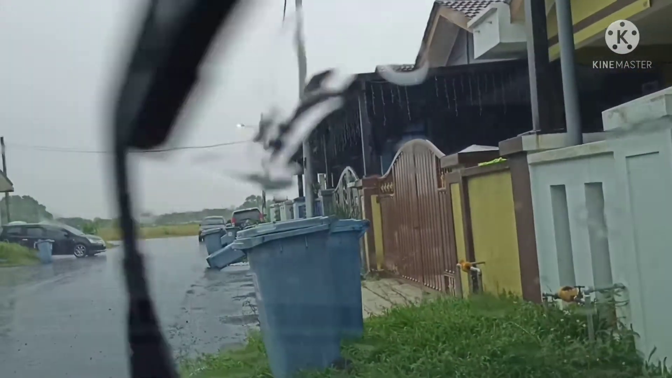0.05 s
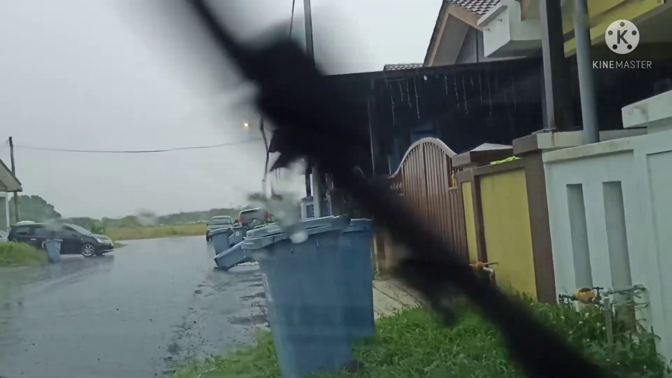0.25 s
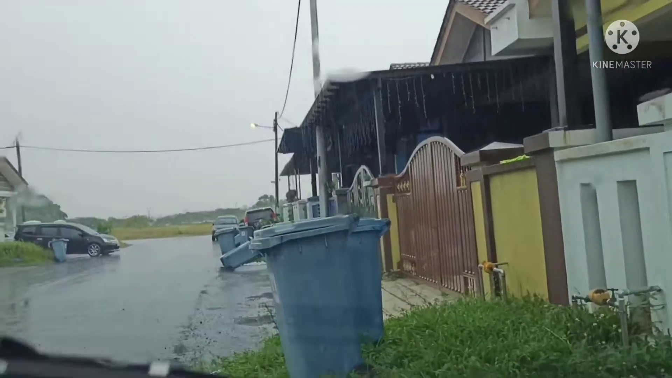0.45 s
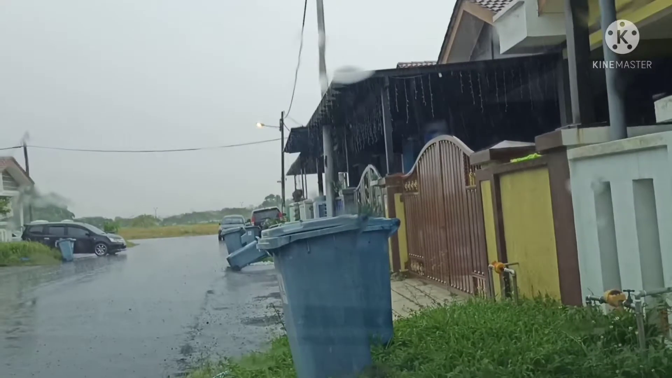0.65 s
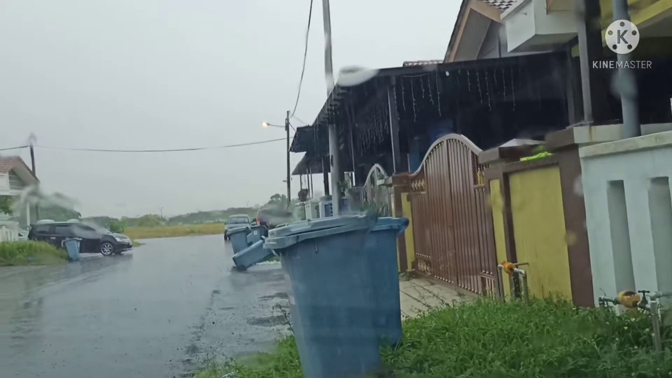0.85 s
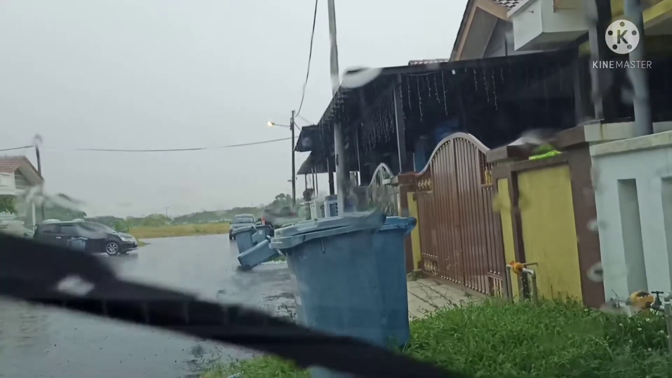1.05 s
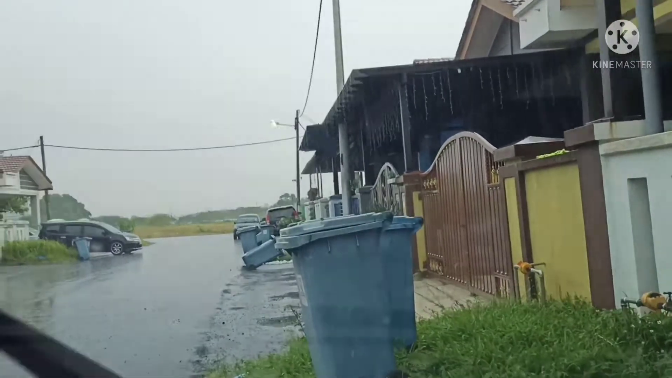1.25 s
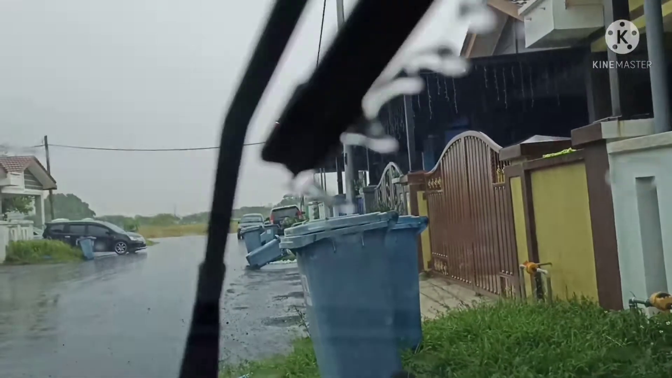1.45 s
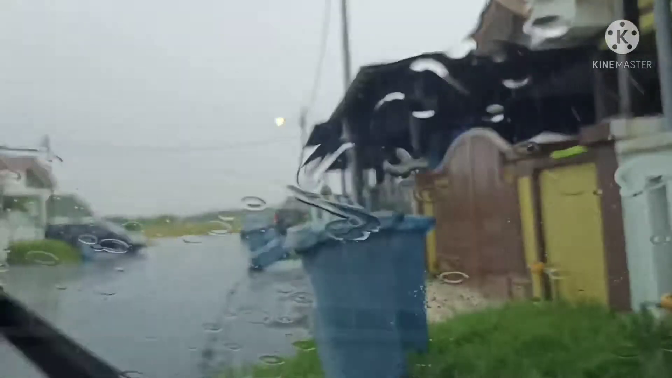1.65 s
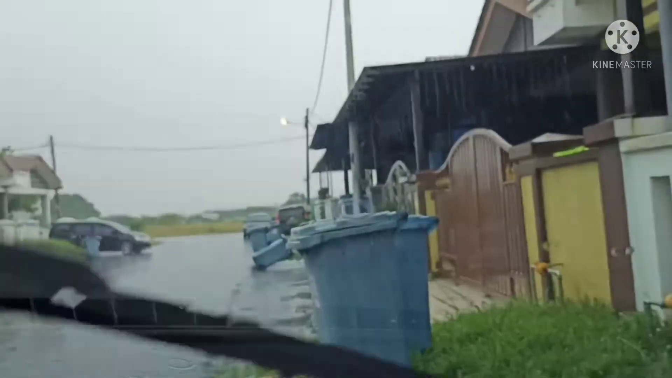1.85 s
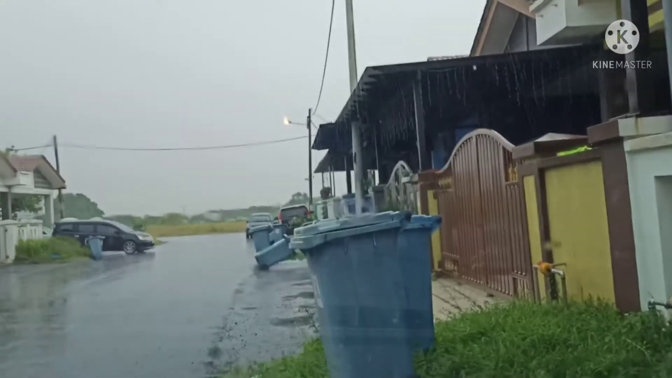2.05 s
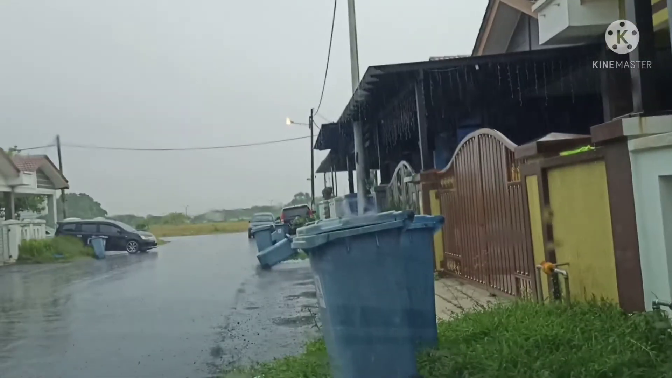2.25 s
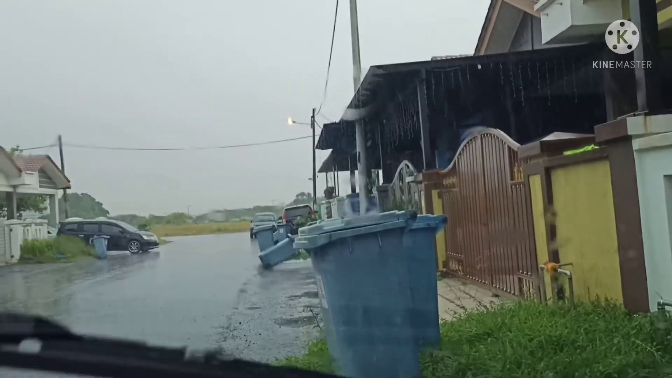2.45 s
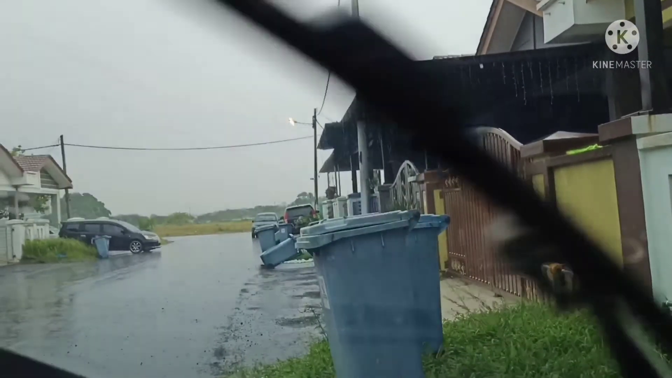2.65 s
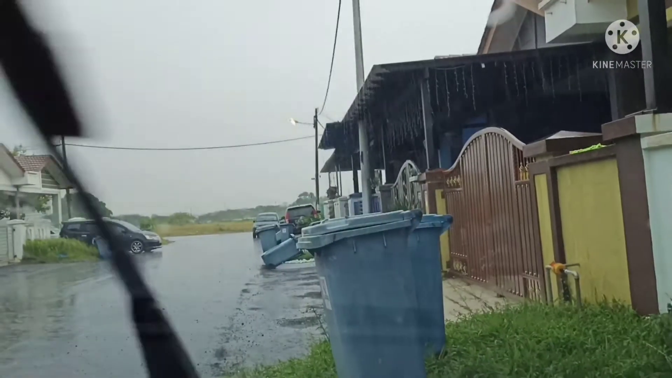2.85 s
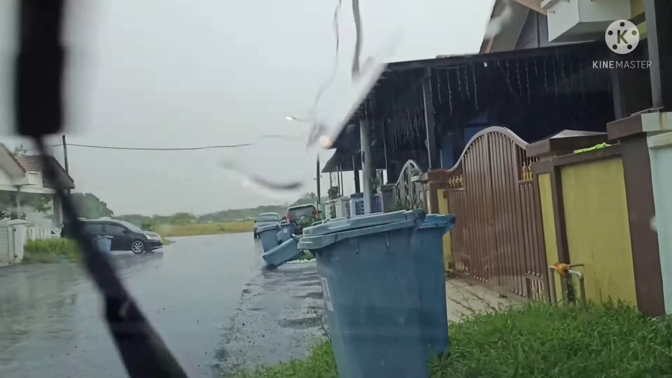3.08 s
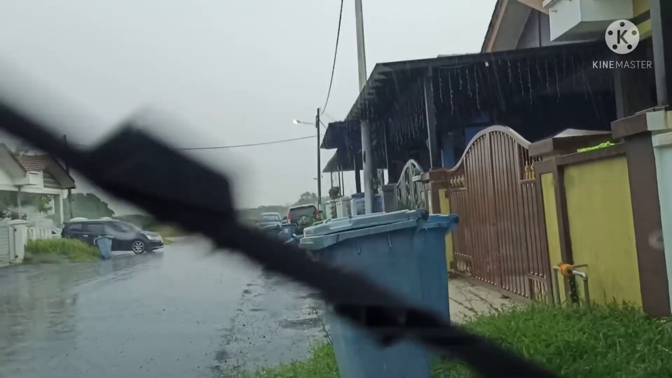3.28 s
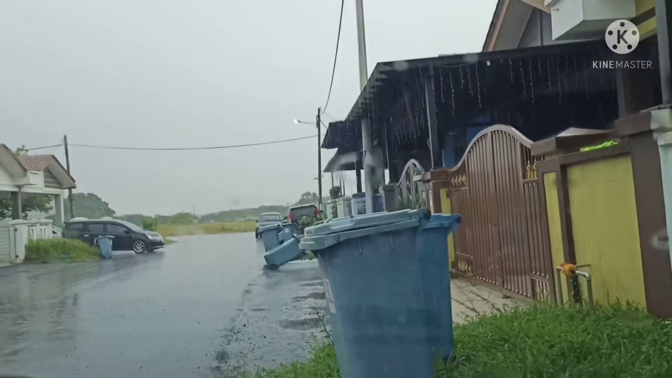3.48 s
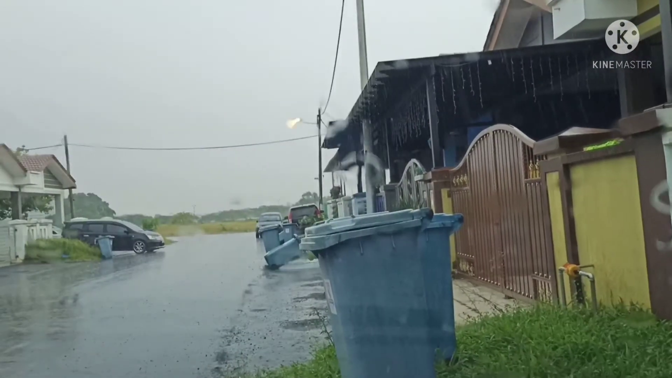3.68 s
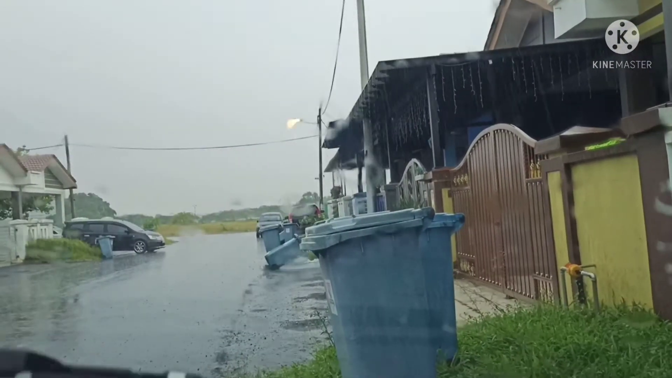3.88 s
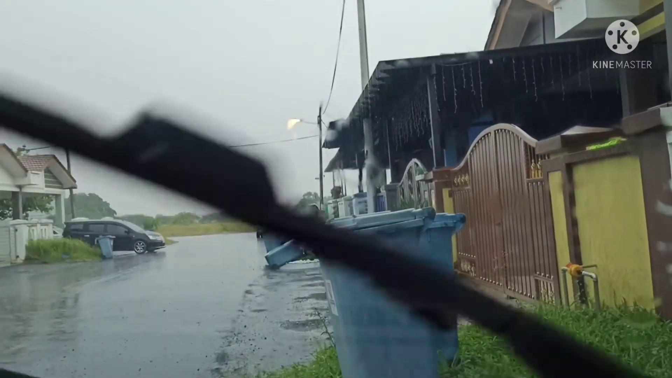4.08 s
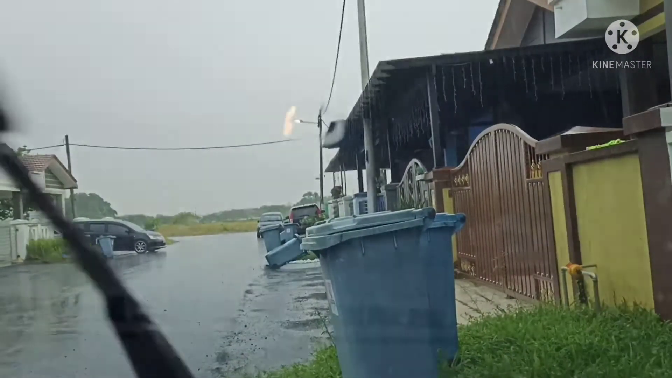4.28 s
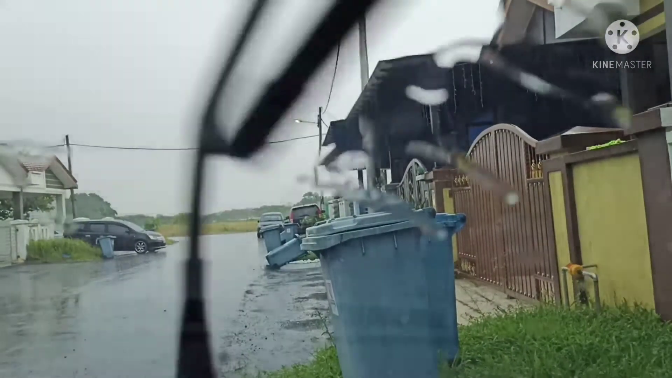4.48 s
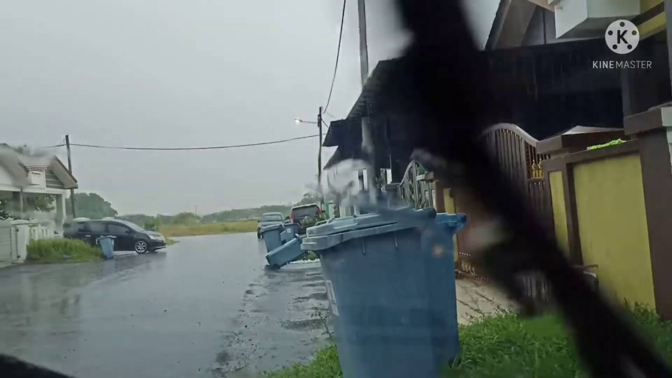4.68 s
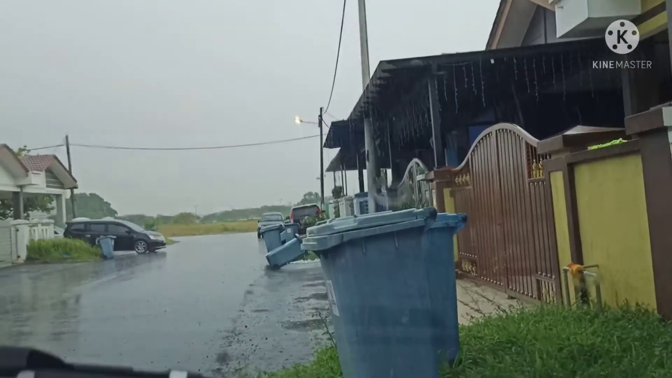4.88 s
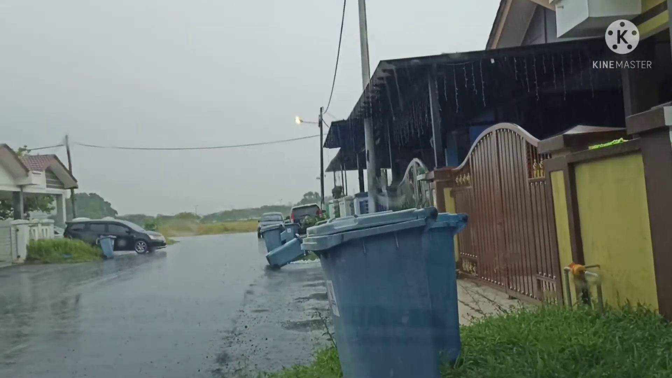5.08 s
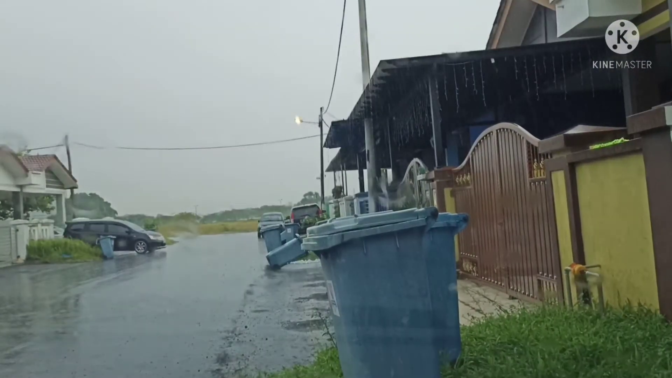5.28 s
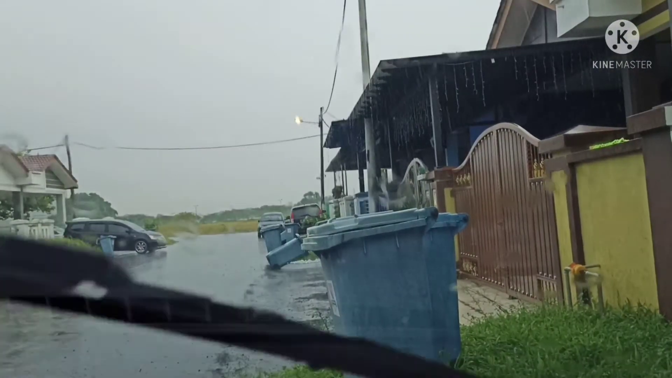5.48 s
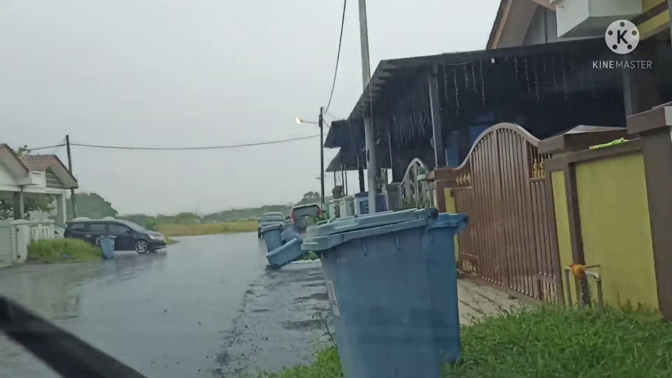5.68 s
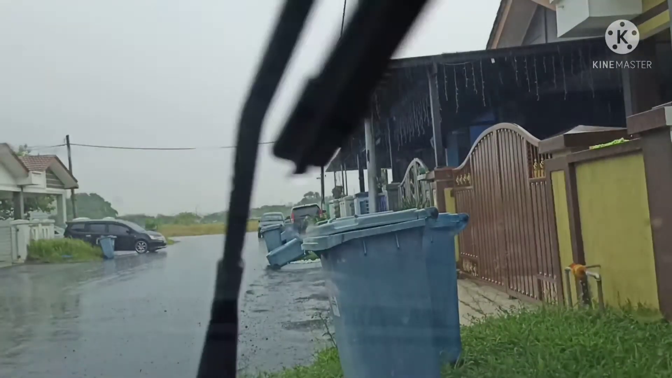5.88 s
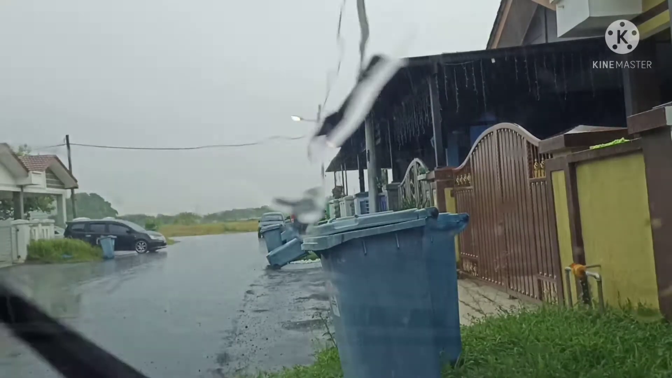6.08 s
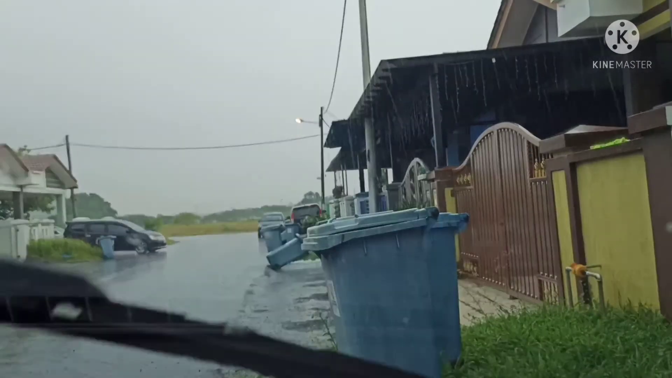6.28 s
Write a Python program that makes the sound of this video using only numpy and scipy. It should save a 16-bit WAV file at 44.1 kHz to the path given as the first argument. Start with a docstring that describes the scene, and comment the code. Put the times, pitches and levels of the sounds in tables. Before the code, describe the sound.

From the front seat of a closed, parked car, windshield wipers beat a steady rhythm, alternating a heavy, dull thump with a softer hollow knock and click. Between turns the rubber drags across the glass with a low rumble, a watery hiss and occasional brief judders. Dense rain patters on the glass and drums on the roof the whole time, with a few bigger drops splashing close by.

```python
"""Heavy rain on a parked car, heard from the front seat: drops tick on the glass and drum on the roof.
The wipers run. At one end of each sweep the blades flip with a thump that rings windscreen and cabin air;
at the other they knock lightly. Play in the linkage adds clicks and hollow knocks. Between turns the
rubber rumbles, judders in stick-slip bursts, hisses through the water film and squelches twice."""
import sys
import numpy as np
from scipy import signal
from scipy.fft import rfft, irfft
from scipy.io import wavfile
from scipy.ndimage import uniform_filter1d

SR = 44100
rng = np.random.default_rng(int(sys.argv[2]) if len(sys.argv) > 2 else 0)


def unload_wav(signal):
    """Save mono or channel-first audio to the path in sys.argv[1] as 16-bit WAV at rate SR, clipped to [-1, 1]."""
    wavfile.write(
        sys.argv[1],
        SR,
        np.round(np.clip(np.atleast_2d(signal).T, -1, 1) * 32767).astype(np.int16),
    )


N = 279153
TIME = np.arange(N) / SR

# drops on glass: (frequency [Hz], level [dB])
GLASS_TONE = [(400, -4), (850, 2.5), (1100, 3), (1900, 0), (2400, -3), (3900, -.7), (4800, -2.5),
              (5600, -6), (6500, -8), (8100, -5.5), (10500, -18.5), (12700, -23), (15000, -20),
              (16000, -22)]
# close splashes: (frequency [Hz], level [dB])
SPLASH_TONE = [(800, -12), (2000, -4), (4000, 0), (6000, -1), (8000, 0), (11000, -9), (15000, -14)]
# drops through the roof lining: (frequency [Hz], level [dB])
ROOF_TONE = [(25, -21), (40, -11), (52, 1.5), (68, -6), (110, 2), (200, 0), (310, -2.5), (470, -10),
             (660, -5.5), (850, -16), (1400, -23), (2500, -52.5)]
# big drops on the windscreen: (time [s], level [dB], treble [dB])
BIG_DROPS = [(0.0727, -27, -3), (0.4249, -23.5, -5), (0.5668, -25.5, -2), (3.3278, -29, -18),
             (3.4155, -22, 3), (3.442, -34, -8), (3.8415, -31, -2), (4.201, -28, -10), (4.2479, -25.5, 7),
             (4.9891, -27.5, -5), (5.5956, -29, -11), (6.0497, -24.5, -2), (6.182, -31.5, 1)]
# rubber dragging on glass: (frequency [Hz], level [dB])
DRAG_TONE = [(30, -52.5), (62, -8), (80, -4), (108, 4.5), (140, 2.0), (180, -1.5), (250, -7.0),
             (400, -18), (520, -21), (750, -28), (1500, -39.5), (4000, -60)]
# extra grip as the blades slow to reverse: (middle [s], level [dB])
GRIPS = [(.22, -26), (0.961, -29.5), (1.69, -25), (2.45, -26.5), (3.19, -29.5), (3.92, -33.5), (4.64, -24),
         (5.411, -25), (6.149, -28.5)]
# patches of water film: (start [s], length [s], attack [s], release [s], level [dB])
FILM_PATCHES = [(-.1, 0.5, .1, 0.23, -45.5), (.33, 0.56, 0.17, 0.089, -44.5), (.96, 0.19, 0.07, .06, -45),
                (1.072, 0.37, 0.038, 0.089, -31), (1.733, 0.89, 0.074, 0.27, -48.5),
                (2.7, 0.37, .06, 0.13, -37.5), (3.037, 0.14, 0.035, 0.087, -37.5)]
# spray off the blade: (frequency [Hz], level [dB])
SPRAY_TONE = [(2000, -26), (4000, -15.5), (5000, -17), (6000, -18), (7200, -6), (8100, 2), (8800, -4),
              (10300, -8.5), (11400, -3), (12500, -8.5), (15000, -0.5), (16000, 2.5)]
# lower hiss of thick film: (frequency [Hz], level [dB])
THICK_FILM_TONE = [(2000, -30), (4000, -11), (4700, 0), (5800, -9), (7000, -0.5), (8200, 0), (10000, -12),
                   (16000, -23)]
# stick-slip bursts: (middle [s], length [s], slip rate [Hz], level [dB])
JUDDER_BURSTS = [(1.1, .08, 186, -18), (1.162, .09, 163, -17.5), (1.225, .13, 166, -22),
                 (2.901, .13, 135, -29), (4.03, .11, 184, -13), (4.09, .09, 218, -26.5),
                 (4.155, .11, 173, -22), (4.305, .12, 191, -23.5)]
# juddering blade: (frequency [Hz], level [dB])
SLIP_TONE = [(30, -40), (60, -21), (85, -14), (175, 5), (350, -15.5), (440, -27), (530, -16.5), (750, -47),
             (1500, -54)]
# wet rubber squelches: (start [s], length [s], first pitch [Hz], last pitch [Hz], level [dB])
SQUELCH_GLIDES = [(1.891, 0.086, 1497, 1020, -31.5), (2.161, .054, 1064, 1910, -31)]
# squelch resonances: (pitch ratio [1], level [dB])
SQUELCH_MODES = [(.48, -3), (1, 1), (1.48, -6.5), (2.35, -4.5), (3.15, -6), (4.6, -13)]
# squelch hiss: (frequency [Hz], level [dB])
SQUELCH_TONE = [(1000, 0.5), (2200, -8), (2900, -6), (4600, 2), (6000, -4), (7200, 4.5), (8200, 2),
                (10000, -11), (16000, -12)]
# play in the linkage: (time [s], knock [dB], pitch [Hz], click [dB])
LINKAGE_KNOCKS = [(.985, -15.5, 304, -24), (1.425, -26, 295, -30), (2.477, -17.5, 301, -37),
                  (3.883, -22.5, 285, -31.5), (3.948, -16, 303, -26), (4.131, -20.5, 298, -37),
                  (4.389, -26.5, 295, -29.5), (5.419, -20, 309, -30.5)]
# linkage click: (frequency [Hz], level [dB])
CLICK_TONE = [(400, -4), (800, 6), (1150, 9), (1700, -6), (3200, 2.5), (4600, -1), (6000, -25), (8500, -10),
              (12000, -31), (16000, -24)]
# blade flips: (time [s], blow [dB], extra cabin boom [dB], extra windscreen ring [dB],
# slap [dB], blow to slap [s], slap to second blade's clack [s])
FLIPS = [(.187, 0.5, 2, -6.5, -20.5, 0.0071, 0.0046), (1.676, -7.5, -2.5, 7.5, -16.5, 0.0033, 0.0043),
         (2.451, -17, 3.5, -4.5, -31, 0.0011, 0.022), (3.159, 0.5, 2, -5, -18.5, .008, 0.0041),
         (4.635, -4.5, -4.5, 1.5, -19.5, 0.0029, 0.00405), (5.397, -16.5, 3, -0.5, -33, 0.0037, 0.021),
         (6.097, -1, -1.5, 1, -23, 0.0063, 0.0029)]
# modes of cabin air (rows 0-3), windscreen (4), wiper arms (rest): (frequency [Hz], level [dB], T60 [s])
THUMP_MODES = [(80.4, -13, 0.34), (100.7, 1, 0.18), (111.6, -11, 0.35), (129, -4.5, 0.16), (169, 5, 0.19),
               (185.5, -1, 0.18), (240, -3, 0.15), (281.2, -6.5, 0.14), (376.7, -13, 0.14),
               (397, -13, 0.065), (530.4, -21.5, 0.14), (628, -10, 0.036)]
# wet rubber slapping glass: (frequency [Hz], level [dB])
SLAP_TONE = [(200, -24), (400, 7.5), (800, -3), (1200, 8), (1700, -11.5), (3500, -20.5), (5000, -9.5),
             (8000, -13), (11000, -26.5), (16000, -21)]
# blade holder clack: (frequency [Hz], level [dB])
CLACK_TONE = [(200, -29), (400, 7.5), (500, -1), (650, 7), (830, 7.5), (1000, -13.5), (1180, -7),
              (1350, -13), (1700, -19), (3500, -21), (8000, -47), (16000, -44)]
# window reflections: (delay [s], gain [1])
WINDOW_ECHOES = [(.0013, 0.2), (.0029, -0.15), (.0047, 0.12), (.0071, -0.14)]


def gain_of(db):
    """Decibels to amplitude."""
    return 10 ** (np.asarray(db) / 20)


def unit_rms(x):
    """Scales to rms 1."""
    return x / np.sqrt(np.mean(x ** 2) + 1e-20)


def add(mix, start_s, sound):
    """Mixes a sound in at start_s."""
    part = mix[max(round(start_s * SR), 0):][:len(sound)]
    part += sound[:len(part)]


def colour(x, tone, size=4096):
    """Minimum-phase, unit-energy filter shaped by (frequency [Hz], level [dB]) rows."""
    hz, db = np.transpose(tone)
    bin_hz = abs(np.fft.fftfreq(size, 1 / SR))
    log_gain = np.log(gain_of(np.interp(np.log(bin_hz + 1), np.log(hz), db)))
    impulse = np.fft.ifft(np.exp(np.conj(signal.hilbert(log_gain)))).real[:size // 2]
    return signal.oaconvolve(x, impulse / np.linalg.norm(impulse))[:len(x)]


def wander(n, rate_hz):
    """Smooth random curve, rms about 1."""
    hz = np.fft.rfftfreq(N, 1 / SR)
    spectrum = rfft(rng.standard_normal(N)) / (1 + (hz / rate_hz) ** 4)
    return unit_rms(irfft(spectrum, N))[:n]


def resonate(x, hz, width_hz=100):
    """Unity-gain resonance tracking the curve hz."""
    carrier = np.exp(2j * np.pi * np.cumsum(hz) / SR)
    pole = np.exp(-np.pi * width_hz / SR)
    return 2 * (carrier * signal.lfilter([1 - pole], [1, -pole], x / carrier)).real


def patter(per_s, spread_db, max_spreads):
    """Random impacts, mostly small, a few large."""
    size = gain_of(spread_db * np.minimum(rng.exponential(1, N), max_spreads))
    return size * rng.choice([-1, 1], N) * (rng.random(N) < per_s / SR)


def spatter(impacts, tone, wet, decay_s):
    """Impacts on a surface, each trailed by droplets and reflections; rms 1."""
    pole = np.exp(-2 / (decay_s * SR))
    power = signal.lfilter([1 - pole], [1, -pole], impacts ** 2)
    tails = wet * np.sqrt(power) * rng.standard_normal(N)
    return unit_rms(colour(impacts + tails, tone))


def rain(base_db=-47, ease_db_per_s=0.4238, gust_db=0.44):
    """Easing shower: ticks on glass, close splashes, a wash of far drops, dull roof drumming."""
    level = gain_of(base_db - ease_db_per_s * TIME + gust_db * wander(N, rate_hz=0.85))
    ticks = spatter(patter(per_s=520, spread_db=5, max_spreads=3.75), GLASS_TONE, wet=.87, decay_s=.0054)
    splashes = spatter(patter(per_s=45, spread_db=4, max_spreads=2.2), SPLASH_TONE, wet=1, decay_s=.002)
    wash = unit_rms(colour(rng.standard_normal(N), GLASS_TONE)) * gain_of(0.58 * wander(N, rate_hz=6.8))
    roof = spatter(patter(per_s=380, spread_db=0.5, max_spreads=5), ROOF_TONE, wet=.87, decay_s=.0081)
    return level * (gain_of(2) * (ticks + .4 * splashes) + gain_of(1.5) * wash + gain_of(12) * roof)


def big_drops():
    """Each drop splashes briefly and gives the pane a dull pat."""
    out, t = np.zeros(N), TIME[:SR // 12]
    for time_s, db, treble_db in BIG_DROPS:
        splash = rng.standard_normal(len(t)) * (np.exp(-t / 0.0013) + 0.065 * np.exp(-t / 0.036))
        tone = [(300, -2.0), (1100, -6.0), (2300, -5.5), (3800, 1.5),
                (6000, -16 + treble_db / 2), (8000, treble_db), (12000, treble_db - 20)]
        pat = 0.38 * np.sin(2 * np.pi * rng.uniform(490, 820) * t) * np.exp(-t / 0.0075)
        add(out, time_s, gain_of(db - 3) * (colour(splash, tone) + pat))
    return out


def drag(sweep_db=-35, clearing_db_per_s=.5, grip_half_width_s=0.094, judder_offset_db=-7):
    """Rubber rumbles on glass: less as the glass clears, most at reversals and judders."""
    level = gain_of(sweep_db - clearing_db_per_s * TIME)
    for middle_s, db in GRIPS:
        level += gain_of(db) * np.exp(-((TIME - middle_s) / grip_half_width_s) ** 2)
    for middle_s, length_s, _, db in JUDDER_BURSTS:
        level += gain_of(db + judder_offset_db) * np.exp(-((TIME - middle_s) / (0.47 * length_s)) ** 2)
    rumble = unit_rms(colour(rng.standard_normal(N), DRAG_TONE))
    rumble /= np.sqrt(uniform_filter1d(rumble ** 2, size=1500) + 0.033)  # spring pressure evens the drag
    return level * rumble


def film_hiss(wiped_db=-60, build_db=5, thick_db=-29):
    """Spray hiss builds as water gathers ahead of the blade; thick film adds a lower hiss."""
    level = np.full(N, gain_of(wiped_db))
    for start_s, length_s, attack_s, release_s, db in FILM_PATCHES:
        t = np.clip(TIME - start_s, 0, length_s)
        gate = np.minimum(t / attack_s, 1) * np.minimum((length_s - t) / release_s, 1) ** 2
        level += gate * gain_of(db + build_db * (t / length_s - .5))
    spray = unit_rms(colour(patter(per_s=14000, spread_db=2.5, max_spreads=4.1), SPRAY_TONE))
    low_hiss = gain_of(-9.5) * unit_rms(colour(rng.standard_normal(N), THICK_FILM_TONE))
    thickness = level / gain_of(thick_db)
    return level * (spray + thickness ** 2 * low_hiss)


def judders(sag_per_s=0.58, jitter=.02, roughness=.48, flutter_db=1):
    """Rubber sticks and slips: uneven, slowing pulses, each with a puff of friction noise."""
    out = np.zeros(N)
    for middle_s, length_s, hz, db in JUDDER_BURSTS:
        t = np.arange(-length_s / 2, length_s / 2, 1 / SR)
        slip_hz = hz * (1 - sag_per_s * t) * (1 + jitter * wander(len(t), rate_hz=70))
        cycles = np.cumsum(slip_hz) / SR
        slips = unit_rms(sum(np.cos(2 * np.pi * k * cycles) for k in range(1, 10)))
        puffs = unit_rms(rng.standard_normal(len(t)) * (0.16 + np.exp(-(cycles % 1) / 0.54)))
        flutter = gain_of(flutter_db * wander(len(t), rate_hz=82))
        burst = unit_rms(colour((slips + roughness * puffs) * flutter, SLIP_TONE))
        add(out, middle_s - length_s / 2, gain_of(db) * burst * np.cos(np.pi * t / length_s))
    return out


def squelches(ring_gain=.48):
    """Wet friction noise rings in resonances that glide together, under a bright hiss."""
    out = np.zeros(N)
    for start_s, length_s, first_hz, last_hz, db in SQUELCH_GLIDES:
        t = np.arange(0, length_s, 1 / SR)
        friction = rng.standard_normal(len(t))
        glide_hz = np.geomspace(first_hz, last_hz, len(t))
        rings = np.zeros(len(t))
        for ratio, mode_db in SQUELCH_MODES:
            hz = ratio * glide_hz
            rings += gain_of(mode_db) * unit_rms(resonate(resonate(friction, hz), hz))
        hiss = unit_rms(colour(rng.standard_normal(len(t)), SQUELCH_TONE))
        swell = np.sin(np.pi * (t / length_s) ** 0.76)  # peaks before the middle
        add(out, start_s, gain_of(db) * swell * unit_rms(ring_gain * rings + hiss))
    return out


def linkage_knocks():
    """The linkage takes up slack: a short hollow knock and a click."""
    out, t = np.zeros(N), TIME[:SR // 8]
    envelope = np.exp(-t / 0.012) * (1 - np.exp(-t / 0.0015))
    for time_s, knock_db, hz, click_db in LINKAGE_KNOCKS:
        ring = np.sin(2 * np.pi * hz * t) - 0.26 * np.sin(2 * np.pi * hz * 1.257 * t)
        click = colour(rng.standard_normal(len(t)) * np.exp(-t / 0.0046), CLICK_TONE)
        add(out, time_s, gain_of(knock_db) * envelope * ring + gain_of(click_db) * click)
    return out


def blade_flips():
    """The blades flip: a blow swells in cabin air, windscreen and arms, with a wet slap and a clack."""
    out, t = np.zeros(N), TIME[:SR // 3]
    swell = 1 - np.exp(-t / 0.02)
    burst = (np.exp(-t / 0.0026) + 0.17 * np.exp(-t / 0.011)) * (1 - np.exp(-t / 0.00047))
    pitch_ratio = 1 + 0.056 * np.exp(-t / 0.014)  # squeezed rubber is stiffer: pitch starts high
    warped_s = np.cumsum(pitch_ratio) / SR
    for time_s, blow_db, boom_db, ring_db, slap_db, delay_s, gap_s in FLIPS:
        for k, (hz, mode_db, t60_s) in enumerate(THUMP_MODES):
            extra_db = boom_db * (k < 4) + ring_db * (k == 4)
            decay = gain_of(blow_db + mode_db + extra_db - 60 * t / t60_s)
            add(out, time_s, (-1) ** k * decay * swell * np.sin(2 * np.pi * hz * warped_s))
        slap = colour(burst * rng.standard_normal(len(t)), SLAP_TONE)
        clack = colour(burst * rng.standard_normal(len(t)), CLACK_TONE)
        add(out, time_s + delay_s, gain_of(slap_db - 1.5) * slap)
        add(out, time_s + delay_s + gap_s, gain_of(slap_db + 2.5) * clack)
    return out


def window_echoes(x, highpass_hz=1500):
    """Windows reflect the treble; seats absorb the rest."""
    out = x.copy()
    treble = signal.sosfilt(signal.butter(2, highpass_hz, "high", fs=SR, output="sos"), x)
    for delay_s, gain in WINDOW_ECHOES:
        add(out, delay_s, gain * treble)
    return out


def scene():
    """Rain and wipers at the front seat, mono."""
    weather = rain() + big_drops()
    impacts = blade_flips() + linkage_knocks()
    rubbing = drag() + film_hiss() + judders() + squelches()
    return window_echoes(weather + impacts + rubbing)[None]


def record(dry, ceiling_db=-1.7, recovery_db_per_s=15, lowpass_hz=15650):
    """A limiter catches the loudest thumps and ducks the rain just after; then a low-pass."""
    over_db = np.maximum(20 * np.log10(abs(dry[0]) + 1e-9) - ceiling_db, 0)
    recovery_db = recovery_db_per_s * TIME
    held_db = np.maximum.accumulate(over_db + recovery_db) - recovery_db
    limited = dry / gain_of(uniform_filter1d(held_db, size=100))
    lowpass = signal.firwin(511, lowpass_hz, window=("kaiser", 9), fs=SR)
    return signal.oaconvolve(limited, lowpass[None], "same")


dry = scene()
out = record(dry)
unload_wav(out)
```